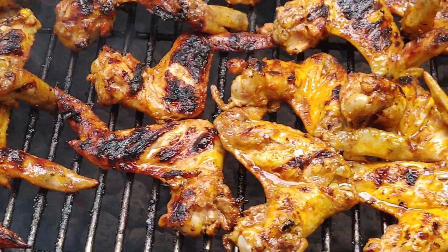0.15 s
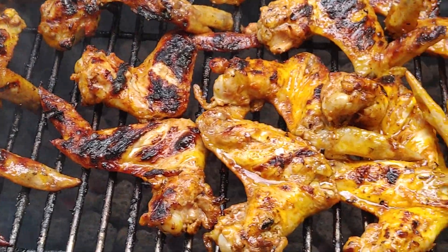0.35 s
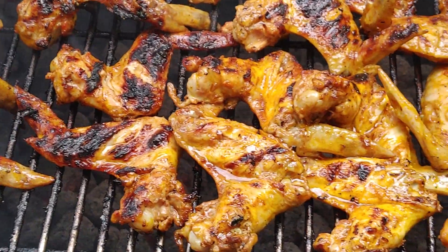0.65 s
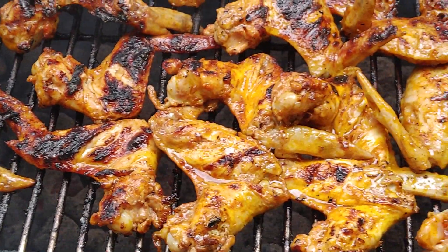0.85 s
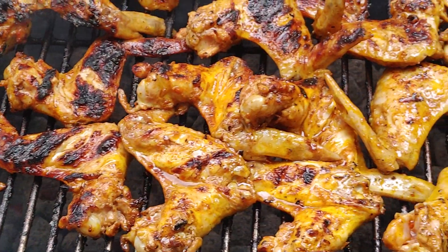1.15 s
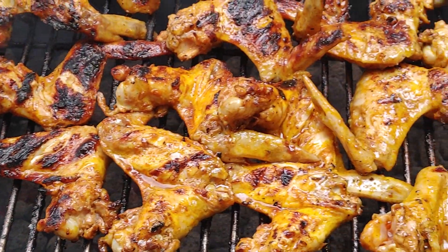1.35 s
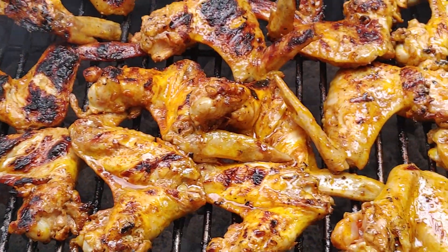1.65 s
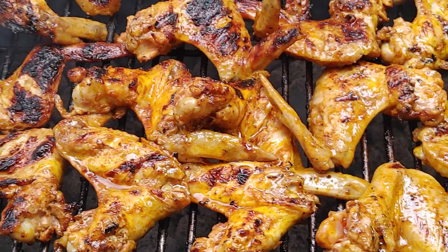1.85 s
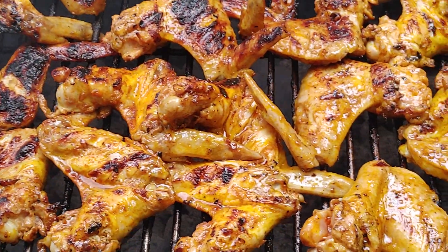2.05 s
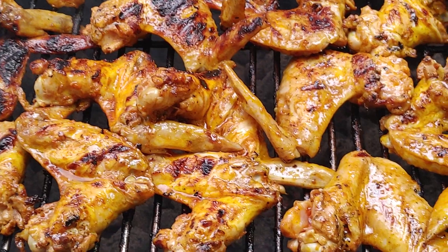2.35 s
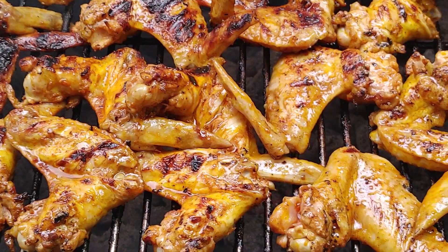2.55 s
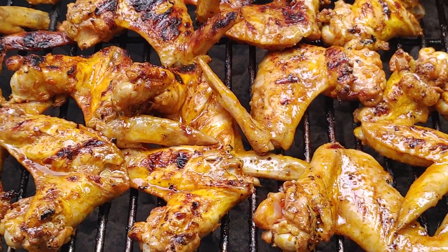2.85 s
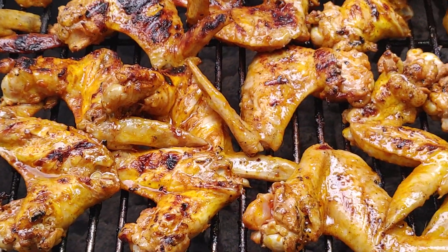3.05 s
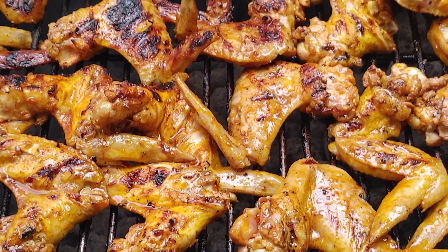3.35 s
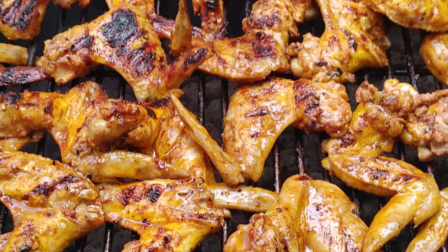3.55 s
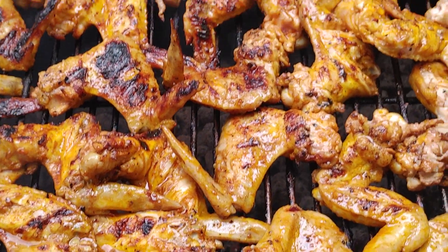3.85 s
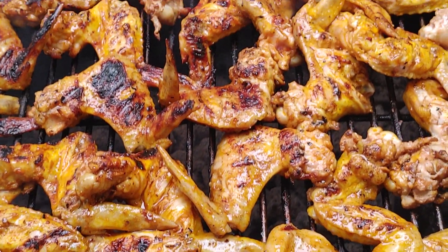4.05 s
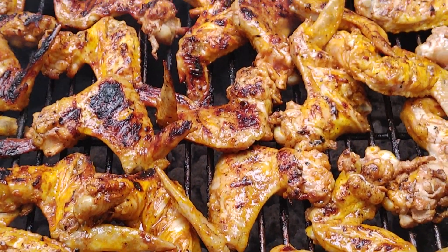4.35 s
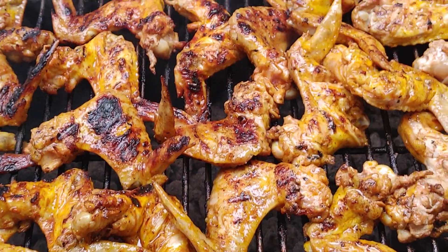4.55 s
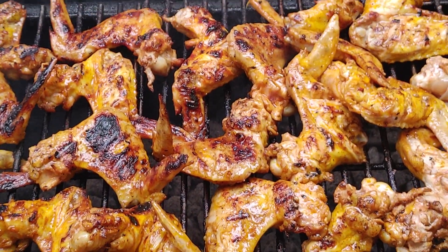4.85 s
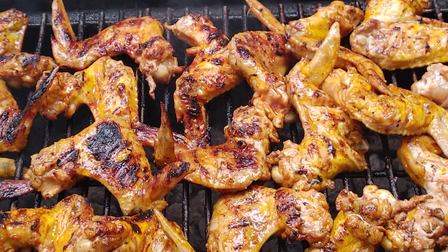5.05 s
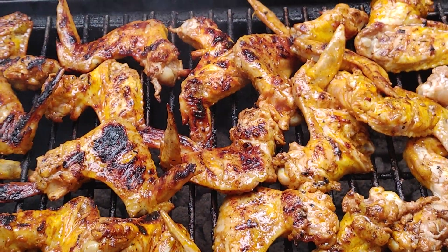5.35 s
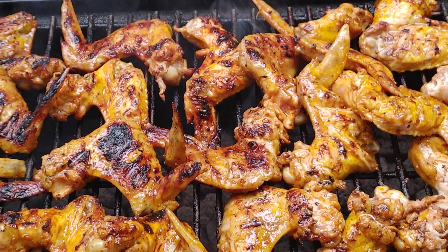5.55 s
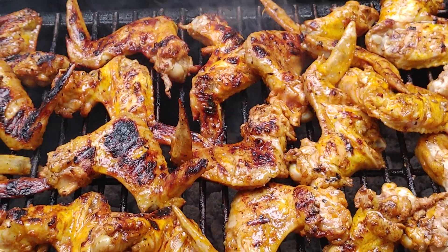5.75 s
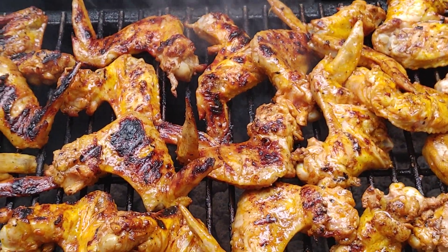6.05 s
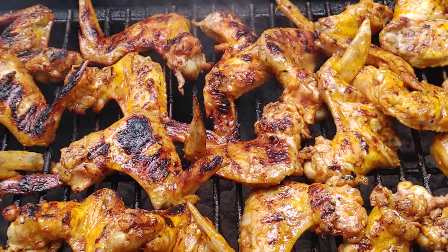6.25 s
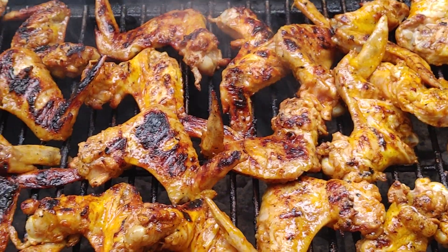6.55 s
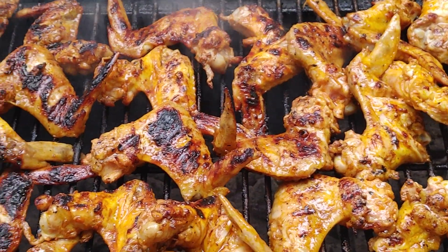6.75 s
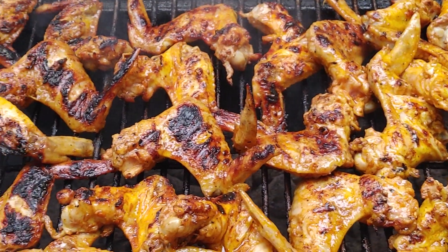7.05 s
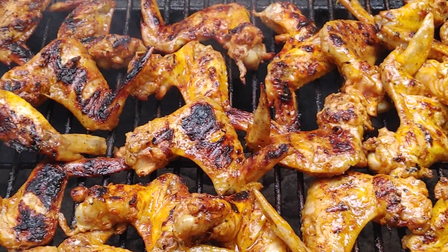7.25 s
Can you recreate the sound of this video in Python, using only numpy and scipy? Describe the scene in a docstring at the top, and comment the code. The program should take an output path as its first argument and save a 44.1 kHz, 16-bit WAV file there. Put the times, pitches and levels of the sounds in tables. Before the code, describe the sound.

Chicken wings sizzle on a barbecue in one unbroken, bright hiss packed with fine wet crackle. The level wavers, with brief flare-ups, and sharp fat snaps and dull spits jump out throughout. Small juice bubbles plop, the grate ticks thinly, and a faint low fire murmur lies beneath. Soft hollow knocks come mainly near six seconds. Close stereo, outdoors, dry, the spits leaning left.

```python
"""Outdoor grill: chicken wings sizzle, in stereo, their frying wandering in level and colour.
Juice boils off on the bars as flurries of tiny filtered noise bursts over a smooth hiss of steam.
Fat snaps as short noise cracks with fizz, spits as low-passed clicks; juice plops as decaying sines.
The grate rings thinly from random taps, the fire murmurs as coloured noise in the bowl,
and a few soft, hollow knocks ring a bank of modes."""
import sys
import numpy as np
from scipy import signal
from scipy.fft import rfft, irfft, next_fast_len
from scipy.io import wavfile

SR = 44100
rng = np.random.default_rng(int(sys.argv[2]) if len(sys.argv) > 2 else 0)


def dump_mix(stems):
    """Bounce the given channels to the path in sys.argv[1] as a 16-bit WAV at rate SR."""
    frames = np.atleast_2d(stems).T  # one column per channel
    limited = np.clip(frames, -1, 1)  # hard clip at full scale
    pcm = np.round(limited * 32767).astype(np.int16)
    wavfile.write(sys.argv[1], SR, pcm)


N = 326781
TIME_S = np.arange(N) / SR
FFT_SIZE = next_fast_len(N + 8192, True)
BIN_HZ = np.maximum(np.arange(FFT_SIZE // 2 + 1) * SR / FFT_SIZE, 1)

# Strength of the frying. Each row: time in seconds, level in dB before HEAT_OFFSET_DB.
HEAT_CURVE = [(0.0, -36), (0.31, -33.5), (0.43, -34), (1.81, -35.5), (2.1, -35.5), (2.41, -33),
              (2.91, -34.5), (3.34, -33.5), (3.94, -37), (4.44, -36), (5.47, -37), (7.41, -36)]
# Juice runs onto a bar and the frying flares up. Each row: start in seconds, rise in dB.
FLARE_EVENTS = [(0.0, 3), (0.29, 1.5), (0.53, 1.5), (0.595, 2), (0.875, 0.3), (0.955, 1), (1.685, 2.5),
                (2.005, 2), (2.175, 1), (2.24, 2.6), (2.535, 1), (2.88, 1), (3.275, 0.9), (3.53, 2),
                (4.11, 0.3), (4.178, 1.5), (4.49, 1.5), (4.615, 1.8), (5.28, 3.5), (6.155, 1)]
# Colour of the hiss. Each row: time in seconds, boost in dB near 2 kHz, boost in dB near 3 kHz.
BODY_CURVE = [(0, -2, -1.5), (1.0, -5.5, 2), (1.5, -0.5, 0.5), (2.5, -5.5, 0), (3.4, -3, 0.5), (4.7, 3, -1),
              (5.3, 3.5, -2), (7.41, 0, -2.5)]
# Colour of the bursts. Each row: frequency in Hz, relative density in dB per Hz.
SIZZLE_SPECTRUM = [(100, -28), (400, -28), (850, -25.5), (1100, -20), (2000, -12.5), (2800, -4), (4000, -3),
                   (7000, 0.0), (9500, -9), (12800, -11), (15500, -11)]
# Hollow resonances of the grill bowl. Each row: frequency in Hz, width in Hz, height in dB.
BOWL_PEAKS = [(600, 80, 3.8), (700, 50, 2.1), (1050, 70, 2.5), (1160, 80, 1.3), (1450, 120, 2.4),
              (1610, 100, 1.2), (4050, 550, 3.7), (5000, 340, 2.0)]
# Peaks and dips of the two microphone ports. Each row: frequency in Hz, width in Hz, height in dB.
LEFT_PORT_PEAKS = [(1130, 900, 4.0), (2100, 470, -2.7), (5820, 420, -2.2), (7970, 910, 6.0),
                   (10590, 1290, 6.8), (11760, 940, 11.4)]
RIGHT_PORT_PEAKS = [(1280, 70, -2.1), (1940, 100, 1.8), (6340, 450, 2.3), (8920, 470, 3.2),
                    (9910, 360, -1.2), (11260, 1130, 8.2)]
# Murmur of the fire in the bowl. Each row: frequency in Hz, relative density in dB per Hz.
MURMUR_SPECTRUM = [(20, -24), (40, -18), (55, -13), (80, -12.5), (105, -4.5), (155, -8.5), (200, -2),
                   (240, -1), (290, -2.5), (360, -8), (600, -13.5), (1000, -22.5), (3000, -66)]
# Thin ringing of the grate. Each row: frequency in Hz, relative level in dB, t60 in seconds.
GRATE_MODES = [(524, -13.5, 0.16), (582, -11, 0.094), (705, -13, 0.095), (1025, 0, 0.068), (1169, 1, 0.053),
               (1406, 5, 0.045), (1460, -7.5, 0.059), (1595, -1, 0.068)]
# Bubbles of juice. Each row: start in seconds, relative level in dB, pitch of the first bubble in Hz.
PLOP_EVENTS = [(0.1183, -39.5, 1270), (1.174, -45, 1150), (1.273, -42.5, 1180), (2.2496, -35, 1530),
               (3.5373, -32, 2390), (3.7673, -40, 1570), (5.158, -30.5, 2250), (5.219, -34, 2400),
               (5.3338, -36.5, 1810), (5.497, -36.5, 1340), (5.871, -33, 2430), (6.533, -36, 2390)]
# Soft hollow knocks. Each row: start in seconds, relative level in dB, hardness in dB.
KNOCK_EVENTS = [(0.176, -56, -2), (0.295, -49, -1), (0.552, -53.5, -3), (1.469, -53, -2), (4.899, -55, -3),
                (5.822, -41, -18), (6.216, -45.5, -7), (6.243, -41, -8), (6.627, -42.5, -3),
                (6.647, -48, -16), (7.362, -55, 3)]
# What the knocks ring with. Each row: frequency in Hz, relative level in dB, t60 in seconds.
KNOCK_RESONANCES = [(233, -1.5, 0.082), (272, -3, 0.037), (500, -27, .04), (715, -15, 0.053),
                    (1080, -14, 0.045), (1270, -5.5, 0.044), (1590, -9, 0.04), (1750, -7, .02)]
# Dull spits close to the left port. Each row: start in seconds, relative level in dB.
SPIT_EVENTS = [(0.3549, -34.5), (0.765, -46), (2.1464, -47), (2.5503, -35), (2.8943, -43), (3.3744, -33.5),
               (3.8055, -45), (3.9867, -34), (4.187, -44), (4.399, -48), (4.5442, -33.5), (5.289, -44),
               (5.337, -42), (6.368, -39), (7.1477, -41.5)]
# Sharp snaps of bursting fat. Each row: start in seconds, relative energy in dB, left minus right in dB.
SNAP_EVENTS = [(0.355, -5, -3), (0.5453, -10, 3), (0.7551, -10, 4), (1.6346, -5.5, 5), (1.9145, -4, -1),
               (2.5504, -4.5, -1), (2.8961, -7, -1), (3.3111, -5, -4), (3.3632, -4, -5), (3.5378, -7.3, 0),
               (3.9863, -8, 5), (4.0289, -6.5, 1), (4.5443, -7.6, 1), (4.934, -9, 4), (5.2909, -6.5, 6),
               (5.3324, -10, 5), (5.7358, -9.6, 4)]

HEAT_OFFSET_DB = 2
FLUTTER_DB, FLUTTER_HZ = 0.48, 8.2   # the boiling is never quite even
FLARE_ATTACK_S, FLARE_HOLD_S, FLARE_RELEASE_S = 0.0042, 0.013, 0.062
# low bubbling at mean heat; dB change per dB of heat, as hotter meat is drier
LOW_DB, LOW_DB_PER_HEAT_DB = -1, -0.96
TOP_FIZZ_DB = 0.2
SMALL_PLOPS_PER_S, SMALL_PLOP_DB = 0.91, -44
SMALL_PLOP_HZ, PLOP_SPREAD_OCTAVES = 1620, 0.33
# each bubble sets off smaller ones beside it; the gap is scaled at random
NEIGHBOUR_GAP_S, NEIGHBOUR_LOSS_DB, NEIGHBOUR_SPREAD_OCTAVES = 0.005, 2.5, 0.12
SMALL_SPITS_PER_S, SMALL_SPIT_DB = 1.1, -50.5
SNAP_HZ, SNAP_SPREAD_OCTAVES = 6500, 0.37
SMALL_SNAPS_PER_S, SMALL_SNAP_DB, SMALL_SNAP_PAN_DB = 2, -9.5, -0.5
RIGHT_LAG_SAMPLES = 183
CUTOFF_HZ = 15850


def from_db(db):
    """Decibels to amplitude gain."""
    return 10 ** (np.asarray(db) / 20)


def rms_one(x):
    """Scale to unit rms."""
    return x / np.sqrt(np.mean(x ** 2) + 1e-20)


def in_time(rows):
    """Interpolate each column of a time curve to every sample."""
    s, *columns = np.transpose(rows)
    return [np.interp(TIME_S, s, column) for column in columns]


def in_hz(points):
    """Interpolate a dB spectrum over log frequency to every bin."""
    hz, db = np.transpose(points)
    return np.interp(np.log(BIN_HZ), np.log(hz), db)


def bumps(peaks):
    """Gaussian resonances summed as a dB response."""
    return sum(db * np.exp(-2 * ((BIN_HZ - hz) / width_hz) ** 2) for hz, width_hz, db in peaks)


def panned(pan_db):
    """Left and right gains; positive favours the left."""
    return from_db(np.array([[.5], [-.5]]) * pan_db)


def drift(rate_hz):
    """Slow random curve of unit rms: noise through a double pole, at 1/40 of the sample rate."""
    pole = np.exp(-80 * np.pi * rate_hz / SR)
    noise = rng.standard_normal(N // 40 + 2002)
    slow = signal.lfilter([1], [1, -2 * pole, pole * pole], noise)[2000:]   # drop the settling
    return np.interp(np.arange(N) / 40, np.arange(len(slow)), rms_one(slow))


def coloured(x, db):
    """Causal minimum-phase filter with this dB response; white noise keeps its level."""
    cepstrum = irfft(np.log(rms_one(from_db(db))), FFT_SIZE)
    # fold onto positive time
    cepstrum[..., 1:FFT_SIZE // 2] *= 2
    cepstrum[..., FFT_SIZE // 2 + 1:] = 0
    response = np.exp(rfft(cepstrum))
    return irfft(rfft(x, FFT_SIZE) * response, FFT_SIZE)[..., :N]


def cut(x, hz, kind, order=2):
    """Butterworth low- or high-pass."""
    sos = signal.butter(order, min(hz, .45 * SR), kind, fs=SR, output="sos")
    return signal.sosfilt(sos, x + 1e-18)


def ring(clicks, hz, t60_s):
    """Two-pole resonator: a unit click starts a decaying sine of height 1."""
    radius = from_db(-60 / (t60_s * SR))
    angle = 2 * np.pi * hz / SR
    poles = [1, -2 * radius * np.cos(angle), radius * radius]
    return signal.lfilter([0, np.sin(angle)], poles, clicks + 1e-18)


def add(out, start_s, sound):
    """Mix a sound in at a time."""
    at = int(start_s * SR)
    out[..., at:at + sound.shape[-1]] += sound[..., :N - at]


def puff(decay_s, size=1024):
    """Exponentially decaying noise of unit energy, different at each port."""
    burst = rng.standard_normal((2, size)) * np.exp(-TIME_S[:size] / decay_s)
    return burst / np.sqrt(np.sum(burst ** 2, axis=1, keepdims=True))


def by_chance(per_s, size=64):
    """Events at random moments: rows of start in seconds and two chance values of spread 1."""
    start_s = np.cumsum(rng.exponential(1, size)) / per_s
    return np.column_stack([start_s, rng.standard_normal((size, 2))])[start_s < TIME_S[-1]]


def flares():
    """Rise of the frying in dB: each flare swells quickly, holds and boils away."""
    shape_s = np.cumsum([0, FLARE_ATTACK_S, FLARE_HOLD_S, FLARE_RELEASE_S])
    return sum(db * np.interp(TIME_S - s, shape_s, [0, 1, 1, 0]) for s, db in FLARE_EVENTS)


def crackle(per_s, spread_db, flurry_db, flurry_hz, scatter_db, scatter_s, count=20):
    """Wet spots fire flurries of bursts, each in its own pitch range; small bursts are most frequent."""
    out = np.zeros((2, N))
    for hz in np.geomspace(700, 14000, count):
        spot_per_s = per_s * np.sqrt(hz / 5000) / count
        chance = spot_per_s / SR * from_db(flurry_db * drift(flurry_hz))
        born = np.flatnonzero(rng.random(N) < chance)
        size_db = spread_db * np.minimum(rng.exponential(1, len(born)), 4)
        clicks = np.zeros(N)
        clicks[born] = from_db(size_db) * rng.choice([-1, 1], len(born))
        # the direct sound, then its scatter from meat and bowl
        path = from_db(scatter_db) * puff(scatter_s)
        path[:, 0] += 1
        path = cut(cut(path, hz / 1.3, "high"), hz * 1.3, "low")
        path[1] = np.roll(path[1], rng.integers(0, 24))   # each spot has its own way to the far port
        out += signal.oaconvolve(rms_one(clicks)[None], path, axes=1)[:, :N]
    return rms_one(out)


def sizzle():
    """Near crackle on a smooth hiss of steam; the hotter the meat, the less it bubbles low down."""
    heat_db, = in_time(HEAT_CURVE)
    body_db, edge_db = in_time(BODY_CURVE)
    heat_db = heat_db + HEAT_OFFSET_DB + flares() + FLUTTER_DB * drift(FLUTTER_HZ)
    low_db = LOW_DB + LOW_DB_PER_HEAT_DB * (heat_db - heat_db.mean())
    near = crackle(per_s=4500, spread_db=4.2, flurry_db=2.8, flurry_hz=50, scatter_db=-1, scatter_s=.003)
    hiss = rng.standard_normal((2, N))
    fry = from_db(-3.0) * near + from_db(-3.5) * hiss
    # high shelf, low shelf, then two peaks for the body
    fry = fry + (fry - cut(fry, 13500, "low", order=1)) * (from_db(TOP_FIZZ_DB) - 1)
    fry = fry + cut(fry, 1020, "low", order=1) * (from_db(low_db) - 1)
    fry = fry + signal.lfilter(*signal.iirpeak(2100, 3.5, fs=SR), fry) * (from_db(body_db) - 1)
    fry = fry + signal.lfilter(*signal.iirpeak(3100, 3, fs=SR), fry) * (from_db(edge_db) - 1)
    return fry * from_db(heat_db) * panned(0.32)


def at_ports(x):
    """Filter by the bursts' own colour and the resonances of the bowl and of each port."""
    ports_db = np.array([bumps(LEFT_PORT_PEAKS), bumps(RIGHT_PORT_PEAKS)])
    return coloured(x, in_hz(SIZZLE_SPECTRUM) + bumps(BOWL_PEAKS) + ports_db)


def murmur(level_db, flutter_db, apart_db):
    """The draught of the fire booms faintly in the bowl, nearly alike at both ports."""
    air = rng.standard_normal(N) + from_db(apart_db) * rng.standard_normal((2, N))
    return coloured(air, in_hz(MURMUR_SPECTRUM)) * from_db(level_db + flutter_db * drift(3.4))


def grate(level_db, per_s, spread_db, far_db):
    """Bursts on the bars tap each grate mode at random, with random strengths."""
    out = np.zeros(N)
    for hz, mode_db, t60_s in GRATE_MODES:
        struck = rng.random(N) < per_s / SR
        taps = struck * from_db(spread_db * np.minimum(rng.exponential(1, N), 3))
        ringing = cut(ring(taps, hz, t60_s), 400, "high")
        out += from_db(level_db + mode_db) * rms_one(ringing)
    return out * from_db([[0], [far_db]])


def plops(level_db, t60_cycles, far_db, size=1024, count=3):
    """Juice bubbles burst in little clusters and ring for a few cycles; smaller ones burst at random."""
    out = np.zeros(N)
    small = [(s, SMALL_PLOP_DB + 2 * strength, SMALL_PLOP_HZ * 2 ** (PLOP_SPREAD_OCTAVES * pitch))
             for s, strength, pitch in by_chance(SMALL_PLOPS_PER_S)]
    for s, db, hz in PLOP_EVENTS + small:
        for k in range(count):
            bubble = ring(signal.unit_impulse(size), hz, t60_cycles / hz)
            gain = from_db(db + level_db - NEIGHBOUR_LOSS_DB * k)
            add(out, min(s, TIME_S[-1]), gain * bubble)
            s = s + NEIGHBOUR_GAP_S * rng.uniform(0.496, 2.2)
            hz = hz * 2 ** (NEIGHBOUR_SPREAD_OCTAVES * rng.standard_normal())
    return cut(out, 830, "high") * from_db([[0], [far_db]])


def knocks(level_db, contact_s, rub_db, low_modes=2):
    """The push rings the two low modes; the rubbing of harder contacts reaches the upper ones."""
    push, rub, out = np.zeros((3, 2, N))
    for s, db, hard_db in KNOCK_EVENTS:
        add(push, s, from_db([db]))
        add(rub, s, from_db(db + hard_db + rub_db) * puff(contact_s))
    for k, (hz, mode_db, t60_s) in enumerate(KNOCK_RESONANCES):
        drive = push if k < low_modes else rub
        out += from_db(mode_db + level_db) * ring(drive, hz, t60_s)
    return cut(out, 192, "high", order=4)


def spits(level_db, lowpass_hz, highpass_hz, right_db):
    """A droplet gives one short push of air, mostly on the left; smaller ones fly at random."""
    clicks = np.zeros(N)
    small = [(s, SMALL_SPIT_DB + 2 * size) for s, size, _ in by_chance(SMALL_SPITS_PER_S)]
    for s, db in SPIT_EVENTS + small:
        clicks[int(s * SR)] = from_db(db + level_db)
    push = cut(cut(clicks, lowpass_hz, "low"), highpass_hz, "high", order=1)
    return push * from_db([[0], [right_db]])


def snaps(level_db, burst_s, fizz_db, fizz_s):
    """A blister bursts with a crack, and its spray fizzes off; smaller ones burst at random."""
    out = np.zeros((2, N))
    small = [(s, SMALL_SNAP_DB + size, SMALL_SNAP_PAN_DB * (1 + side))
             for s, size, side in by_chance(SMALL_SNAPS_PER_S)]
    for s, db, pan_db in SNAP_EVENTS + small:
        hz = SNAP_HZ * 2 ** (SNAP_SPREAD_OCTAVES * rng.standard_normal())
        crack = ring(puff(burst_s), hz, 0.00086)
        crack /= np.sqrt(np.sum(crack ** 2, axis=1, keepdims=True))   # unit energy
        fizz = from_db(fizz_db) * puff(fizz_s)
        add(out, s, from_db(db + level_db) * panned(pan_db) * (crack + fizz))
    return out


def scene():
    """Sum everything on the grill."""
    bursts = sizzle() + snaps(level_db=-5, burst_s=0.00036, fizz_db=-4, fizz_s=.004)
    frying = at_ports(bursts)
    fire = murmur(level_db=-65.5, flutter_db=1.5, apart_db=-14.5)
    bars = grate(level_db=-67, per_s=90, spread_db=7.0, far_db=-2)
    bubbles = plops(level_db=8.0, t60_cycles=9.3, far_db=-3.0)
    thuds = knocks(level_db=2.0, contact_s=0.01, rub_db=11.5)
    droplets = spits(level_db=31, lowpass_hz=1570, highpass_hz=220, right_db=-21)
    return frying + fire + bars + bubbles + thuds + droplets


def record(dry):
    """Delay the right channel by about 4 ms and cut the top with a steep elliptic low-pass."""
    late = np.array([dry[0], np.pad(dry[1], (RIGHT_LAG_SAMPLES, 0))[:N]])
    return signal.sosfilt(signal.ellip(12, .1, 70, CUTOFF_HZ, fs=SR, output="sos"), late)


dry = scene()
out = record(dry)
dump_mix(out)
```